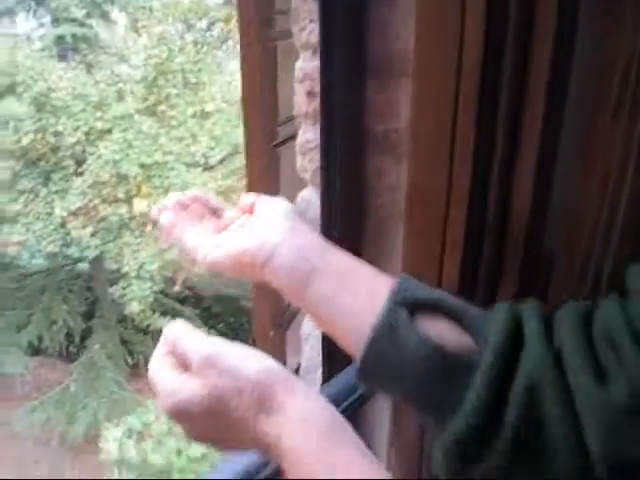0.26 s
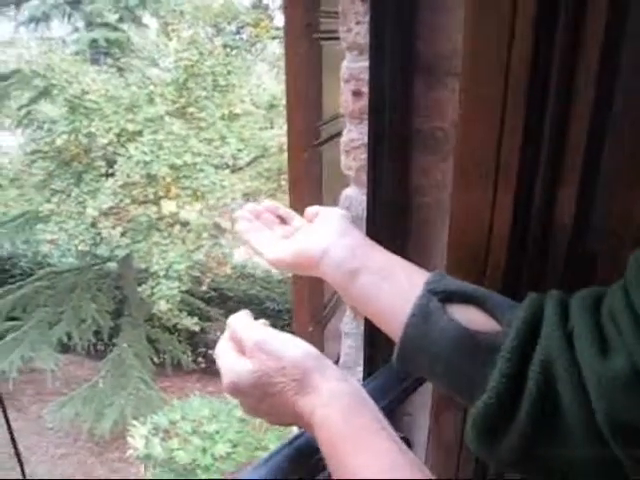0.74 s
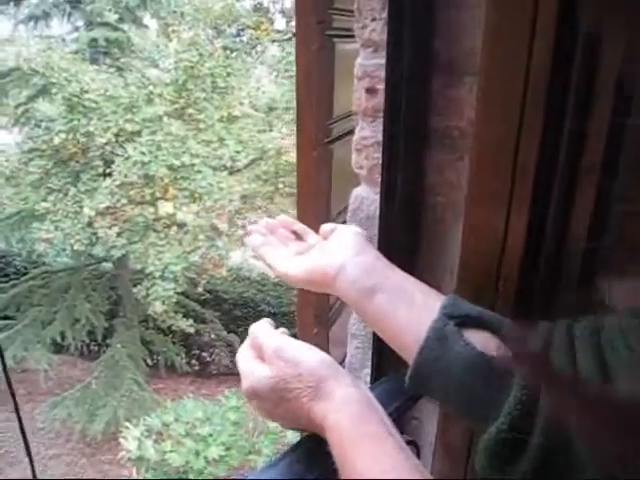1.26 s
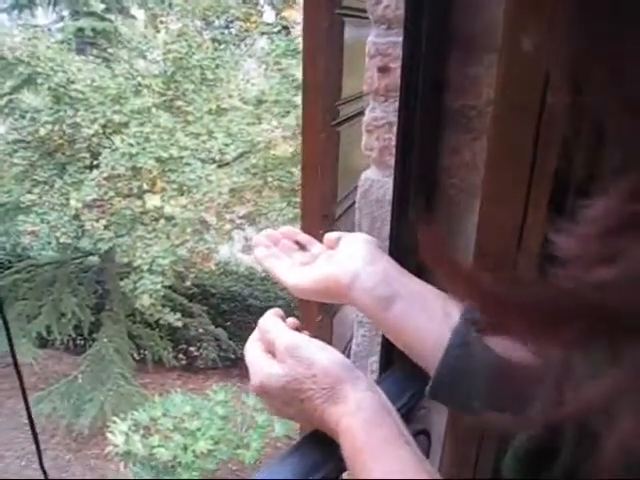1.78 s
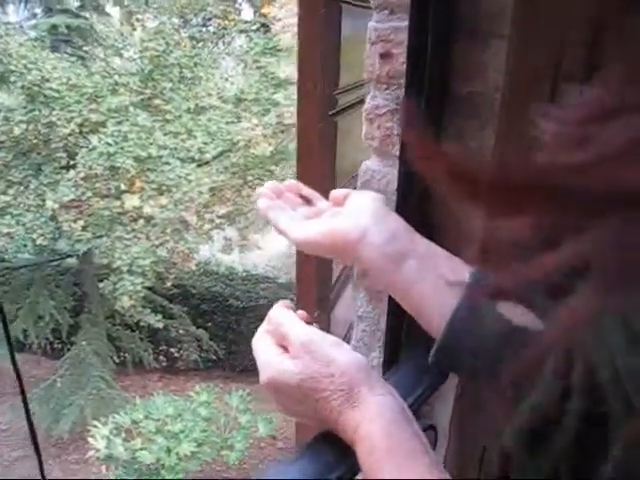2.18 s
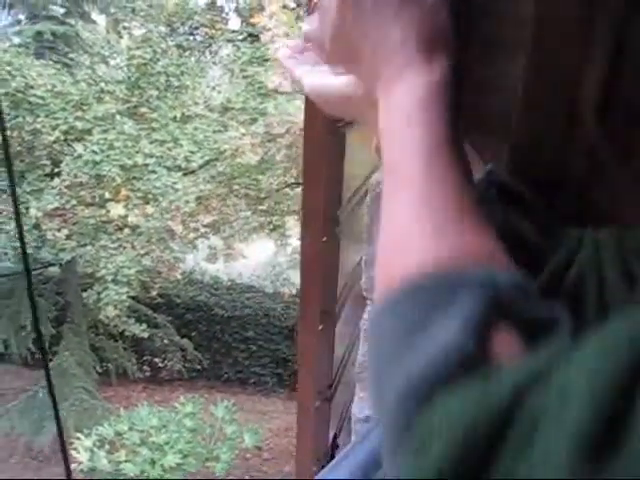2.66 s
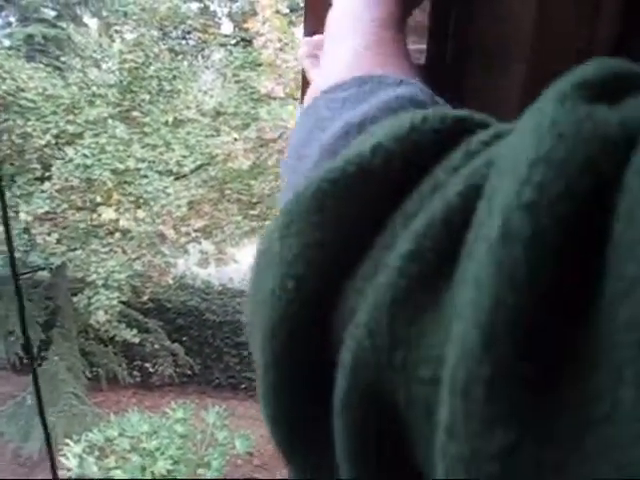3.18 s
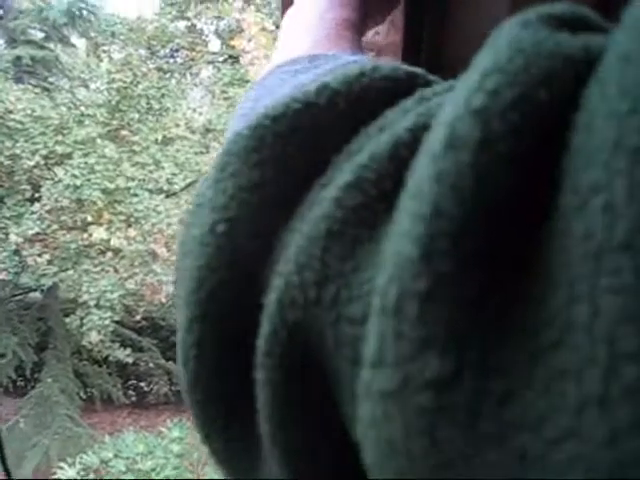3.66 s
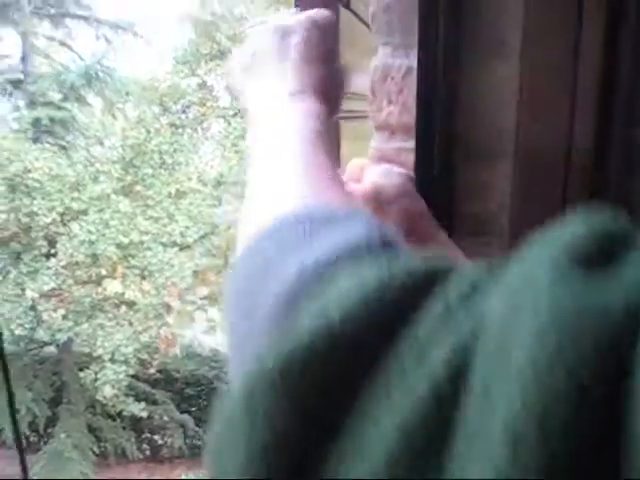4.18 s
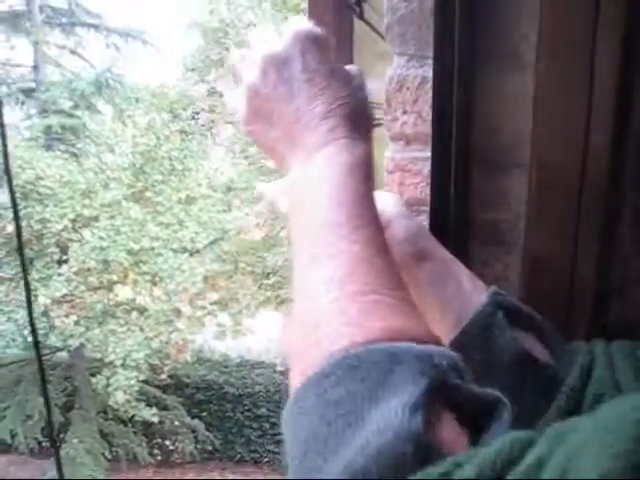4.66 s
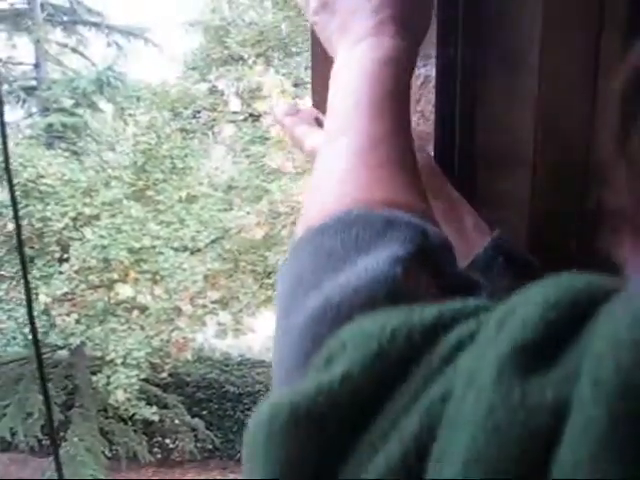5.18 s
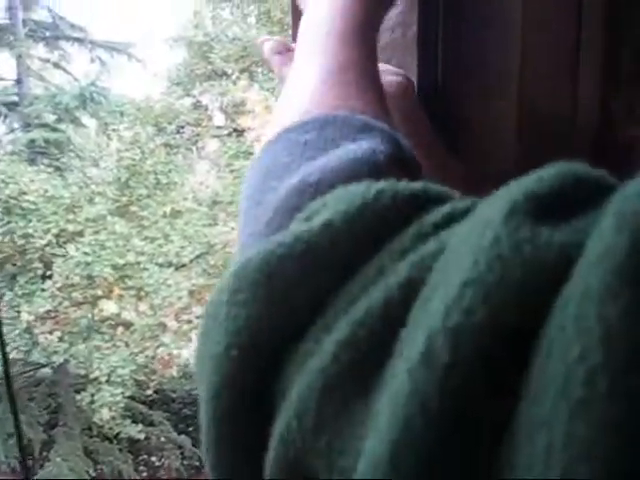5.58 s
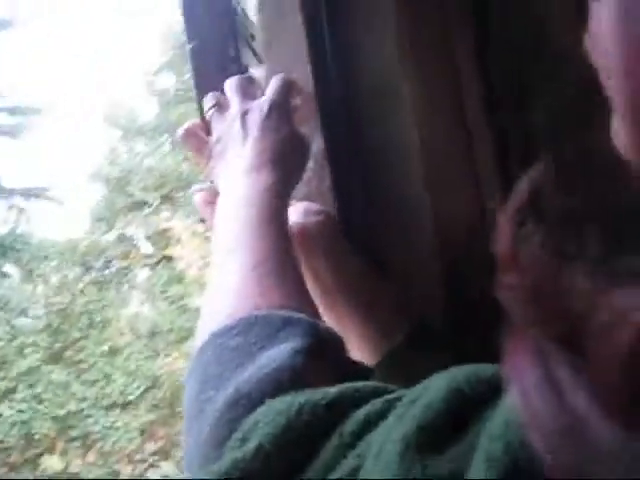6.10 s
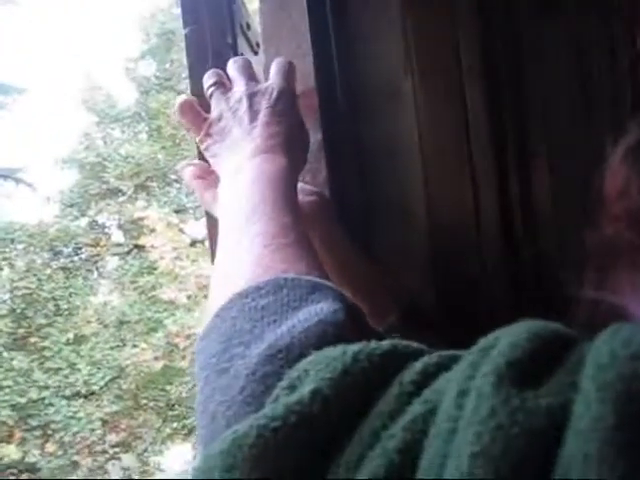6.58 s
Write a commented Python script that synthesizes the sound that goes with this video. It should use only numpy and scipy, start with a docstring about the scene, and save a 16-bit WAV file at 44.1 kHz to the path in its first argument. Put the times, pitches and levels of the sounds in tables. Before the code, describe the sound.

Through an open window, short brassy peacock honks break upward and drop, three seconds of calls, a pause, then four more, over distant traffic.

```python
"""A garden heard through an open window: a peacock some way off honks eight times, with faint far calls between.
Each honk is a harmonic tone that sweeps up and drops back, lighting up as its partials cross fixed resonances;
walls echo it. Distant traffic is shaped noise and wavering hum lines; a soft rustle is noise of uneven level.
A faint tick at the start, then one knock, are brief pulses with a slow swing back. A cheap camera samples slowly
and holds each sample, which mirrors the sound into the treble."""
import sys
import numpy as np
from scipy import signal
from scipy.fft import rfft, irfft, next_fast_len
from scipy.io import wavfile
from scipy.ndimage import map_coordinates

SR = 44100
rng = np.random.default_rng(int(sys.argv[2]) if len(sys.argv) > 2 else 0)


def pcm_store(signal):
    """Save signal as 16-bit PCM."""
    levels = np.round(np.clip(np.atleast_2d(signal), -1, 1) * 32767)
    wavfile.write(sys.argv[1], SR, levels.astype(np.int16).T)


def makeup_ratio(level_db):
    """Linear amplitude ratio for a level in decibels (20 dB per factor of ten)."""
    decades = np.asarray(level_db, float) / 20
    return 10 ** decades


N = 301644
HOLD = 4  # output samples for each one the converter takes

# Relative spectral density of the preamp hiss: f/Hz, level/dB
HISS_SPECTRUM = [(20, -31), (1000, -8.5), (2000, -6.5), (3500, -7.5), (5500, -7.5)]
# Relative spectral density of the traffic rumble: f/Hz, level/dB
RUMBLE_SPECTRUM = [(38, -47), (64, -7), (81, -9.5), (108, -2), (167, -1), (265, -10), (292, -17),
                   (330, -13.5), (430, -42), (730, -120)]
# Rumble level before its random swell: t/s, level/dB
RUMBLE_LEVEL = [(0.0, -38.5), (0.34, -41.5), (0.68, -38), (1.94, -39), (3.45, -39), (4.11, -38.5),
                (6.51, -40), (6.84, -40.5)]
# Hum lines, mean frequency and rms level before wavering: f/Hz, level/dB
HUM_LINES = [(47, -45), (120, -53.5), (410, -59.5)]
# Relative spectral density of the steady outdoor wash: f/Hz, level/dB
WASH_SPECTRUM = [(200, -44), (340, -18), (356, -13.5), (408, -5), (486, -9.5), (513, -6), (602, -4),
                 (798, -13.5), (1120, -10), (1480, -19), (2100, -28), (2730, -38), (4620, -120)]
# Relative spectral density of the rustle: f/Hz, level/dB
RUSTLE_SPECTRUM = [(900, -32), (1800, -0.5), (2800, -2.5), (4500, -8), (5500, -15.5)]
# Rustle level before its uneven grain: t/s, level/dB
RUSTLE_LEVEL = [(0, -53), (.2, -57), (.38, -50), (.55, -55), (.85, -52.5), (1.3, -57.5), (5.8, -57.5),
                (6.4, -52.5), (6.84, -57)]
# A faint tick at the start, then one knock against the camera body:
# t/s, pulse level/dB, pulse decay time/s, swing relative to pulse/dB
TICK_AND_KNOCK = [(.021, -22, .0002, -20), (.8649, -16.5, .0012, -4)]

# Throat and window resonances: centre f/Hz, width/Hz, level/dB
RESONANCES = [(520, 216, -3), (669, 147, 3.5), (991, 37, -3.5), (1107, 49, -2.5), (1275, 42, 1.5),
              (1445, 41, 3), (1618, 140, -4)]
# Near wall echoes: delay/s, level at 630 Hz/dB
NEAR_WALLS = [(.055, -28.5), (.1, -20), (.135, -31.5), (.195, -28.5)]

# Voice levels below hold ahead of the resonances; partial levels are relative to the fundamental.
# Shape of one far call: t from its start/s, f/Hz, relative effort/dB, second partial/dB, third partial/dB
FAR_CALL_SHAPE = [(0, 303, -61, 17, -10), (.015, 322.5, -17.5, 13.4, -10), (.035, 315, -11, 7.4, -11),
                  (.048, 322, -8, 11, -10), (.056, 520, -5, 11, -15), (.072, 534, -7.5, 15, -23),
                  (.09, 554, -15, 8.9, -19), (.11, 560, -15, 6.4, -13)]
# Faint far calls; the one at .94 is the second honk's echo off the far wall: start t/s, gain on the shape/dB
FAR_CALLS = [(.205, -31.5), (.94, -37.5), (1.93, -36.5), (3.957, -36.5), (5.705, -36.5)]
# Thin second voice riding over the first honk: t/s, f/Hz, effort/dB, second partial/dB, third partial/dB
SQUEAL = [(0.351, 1220, -52, -40, -40), (0.381, 1323, -31, -40, -40), (.415, 1580, -41, -40, -40),
          (.437, 1462, -29, -40, -40), (.46, 1400, -54, -40, -40)]

# Shapes of the parts of a honk, before each part's own shifts of pitch and level:
# fraction of part length, f/Hz, relative effort/dB, second partial/dB, third partial/dB
SCOOP = [(0, 245, -24, 20, -10), (.6, 278, -11, 16, -6)]  # upward start of every honk
LOW_NOTE = [(0, 300.6, -1.5, 15, -13), (1, 302.7, -1, 11.1, 0)]  # low note of every honk
MIDDLE = [(0, 481.7, 1.5, 2.27, -20.5), (.55, 486.3, -4, -0.29, -8), (1, 480, 0, -2, -17)]  # middle register of a full honk
CLIMB = [(0, 590, -6, -10, -23)]  # step up to the top note
TOP = [(0, 629.3, 0, -16, -35), (.3, 641, -0.5, -21, -33), (.75, 640, 2.5, -15.5, -33),
       (1, 627, -2.5, -15.5, -30)]  # top note
FALL = [(.25, 602, -6, -8, -26), (.55, 525, -8, -1, -9.5), (1, 490, -17, -10, 2)]  # drop from the top note
GLIDE = [(0, 505, -2.5, 22.5, -6), (.2, 541, -3.5, 26.4, 9), (.5, 569, -6.5, 19.5, -15),
         (.8, 597, 1.5, 11, -20)]  # upward glide of a thin honk
CREST = [(0, 628, -12, 3, -25), (.42, 636, -0.5, -5.5, -25), (.72, 637, -9.5, -2, -22),
         (1, 644.5, -21, 10.5, -20)]  # swell at its crest
DROP = [(.3, 541, 0, 14, -14), (.55, 520, -4, 27, 3), (1, 482, -10, 8.4, 5)]  # drop from the crest

# Opening of every honk: low note t/s, scoop length/s, low note length/s, level/dB, pitch shift/Hz
OPENINGS = [(0.291, .024, .028, -40, -2.5), (0.694, .012, .014, -37, 13.5), (1.376, .032, .012, -31.5, 1),
            (2.053, .03, 0.0095, -30.5, 4), (4.739, .03, 0.0062, -41, -3), (5.102, .015, .01, -32.5, 3),
            (5.952, .028, .021, -33.5, 0), (6.598, .027, .012, -31.5, 0)]
# Middles of the full honks: t/s, length/s, added pitch rise/Hz, level/dB, second partial shift/dB
MIDDLES = [(1.393, 0.021, 53.8, -24, 5.5), (2.068, 0.022, 55.6, -23, 3.5), (4.762, 0.03, 61.3, -22.5, 0.5),
           (5.978, 0.0241, 35.3, -22.5, 8), (6.614, 0.026, 36.4, -20.5, 3)]
# Tops of the full honks: t/s, length/s, level/dB, sag over the note/dB, period doubling/dB
TOPS = [(1.427, 0.039, -12, -7.5, -26), (2.106, .038, -11.5, -9, -29), (4.812, 0.03, -11.5, -10, -16),
        (6.017, .046, -11.5, -11.5, -27), (6.656, 0.041, -12.5, -9, -15)]
# Glides of the thin honks: t/s, length/s, level/dB
GLIDES = [(0.325, 0.034, -35.5), (0.721, 0.049, -39.5), (5.136, .058, -41.5)]
# Crests of the thin honks: length/s, added pitch rise/Hz, level/dB, second partial shift/dB, drop level/dB
CRESTS = [(0.067, 13.7, -16.5, -14, -41), (0.062, 51.8, -24.5, 1.5, -44.5), (0.041, 34, -24.5, 2, -40.5)]


def filtered(x, response):
    """Linear filtering: the spectrum of x times a complex response of frequency."""
    m = next_fast_len(len(x) + 8192)
    hz = np.fft.rfftfreq(m, 1 / SR)
    return irfft(rfft(x, m) * response(hz), m)[:len(x)]


def noise(spectrum):
    """Coloured noise of rms 1: white noise shaped by spectrum points on a log-frequency axis."""
    f, db = np.transpose(spectrum)
    white = rng.standard_normal(N)
    x = filtered(white, lambda hz: makeup_ratio(np.interp(np.log(hz + 1), np.log(f + 1), db)))
    return x / x.std()


def wobble(rate, size=N):
    """Slow random modulation: a smooth curve through random knots, rate of them a second."""
    knots = rng.standard_normal(int(size * rate / SR) + 4)
    return map_coordinates(knots, [np.arange(size) * rate / SR])


def level(rows):
    """Amplitude envelope: gain per sample, interpolated in decibels between points."""
    return makeup_ratio(np.interp(np.arange(N) / SR, *np.transpose(rows)))


def add(track, s, x):
    """Superposition: sums x into track from time s."""
    span = track[round(s * SR):][:len(x)]
    span += x[:len(span)]


def preamp_hiss():
    """Stationary electrical noise with a fixed coloured spectrum."""
    return makeup_ratio(-46.5) * noise(HISS_SPECTRUM)


def traffic():
    """Noise and tones combined: a slowly swelling far rumble, wavering hum lines and a steadier wash."""
    swell_db = .7 * wobble(3) + .7 * wobble(9)
    rumble = level(RUMBLE_LEVEL) * makeup_ratio(swell_db) * noise(RUMBLE_SPECTRUM)
    wash = makeup_ratio(-44 + 0.079 * wobble(1.87)) * noise(WASH_SPECTRUM)
    hum = np.zeros(N)
    for hz, rms_db in HUM_LINES:
        gain = np.sqrt(2) * makeup_ratio(rms_db + 2.2 * wobble(9))
        phase = 2 * np.pi * np.cumsum(hz + 1.75 * wobble(7)) / SR
        hum += gain * np.sin(phase)
    return rumble + wash + hum


def rustle():
    """Amplitude-modulated noise: a soft rustle that comes and goes, uneven in grain."""
    grain = makeup_ratio(1.8 * wobble(25))
    return level(RUSTLE_LEVEL) * grain * noise(RUSTLE_SPECTRUM)


def tick_and_knock():
    """Impulse and damped oscillation: each is a quick, soft-edged pulse, then a slow swing back."""
    out = np.zeros(N)
    t = np.arange(SR // 20) / SR
    for s, db, decay_s, swing_db in TICK_AND_KNOCK:
        pulse = 2.4 * (1 - np.exp(-(t / .0005) ** 2)) * np.exp(-t / decay_s)
        swing = makeup_ratio(swing_db) * np.sin(2 * np.pi * 42 * t) * np.exp(-t / .01)
        add(out, s - .0005, makeup_ratio(db) * (pulse - swing))
    return out


def garden(x, tail_db, t60, far_db):
    """Reflection and scattering: direct sound, wall echoes and a diffuse tail; leaves scatter high partials more."""
    t = np.arange(SR) / SR
    tail = rng.standard_normal(SR) * makeup_ratio(-60 * t / t60) * (1 - np.exp(-t / 0.013))
    path = makeup_ratio(tail_db) * tail / np.linalg.norm(tail)
    for delay, db in NEAR_WALLS + [(.265, far_db)]:  # the last is one far wall
        path[round(delay * SR)] += makeup_ratio(db)
    path = filtered(path, lambda hz: (hz / 630) ** 0.6)
    path[0] += 1  # direct sound
    return signal.fftconvolve(x, path)


def resonances(hz):
    """Forced resonance: a causal sum of band-pass peaks, cut off steeply above the last."""
    peaks = 0
    for k, (centre, width, db) in enumerate(RESONANCES):
        damping = 1j * hz * width
        peak = damping / (centre * centre - hz * hz + damping)
        peaks = peaks + (-1) ** k * makeup_ratio(db) * peak  # alternating sign
    return peaks / (1 + (hz / 1720) ** 20)


def voice(rows, double_db):
    """Harmonic source: three gliding partials, breath gated each cycle, period doubling adding lines halfway."""
    s, *cols = np.transpose(rows)
    t = np.arange(s[0], s[-1], 1 / SR)
    size = len(t)
    hz, effort_db, second_db, third_db = (np.interp(t, s, c) for c in cols)
    phase = 2 * np.pi * np.cumsum(hz * (1 + .007 * wobble(150, size))) / SR

    def flutter():
        """Random amplitude modulation, drawn afresh at each call."""
        return makeup_ratio(1.8 * wobble(140, size))

    second = makeup_ratio(second_db) * flutter() * np.sin(2 * phase)
    third = makeup_ratio(third_db) * flutter() * np.sin(3 * phase)
    halves = makeup_ratio(double_db) * flutter() * (np.sin(3 * phase / 2) + np.sin(5 * phase / 2) / 3)
    breath = makeup_ratio(-2 + second_db / 2) * rng.standard_normal(size) * (1 + np.sin(phase))
    # a fast glide or a break of register thins the overtones
    steady = 1 / (1 + (np.gradient(hz) * SR / 6500) ** 2)
    effort = makeup_ratio(effort_db + 1.1 * wobble(90, size))
    return effort * (np.sin(phase) + steady * (second + third) + halves + breath)


def part(shape, start, length, db, rise_hz=0, bright_db=0, sag_db=0):
    """Scaling of a contour: one part of a honk placed in time, stretched, bent upward and set in strength."""
    return [(start + length * u, hz + rise_hz * u, effort_db + db + sag_db * u, second_db + bright_db, third_db)
            for u, hz, effort_db, second_db, third_db in shape]


def opening(before):
    """Rising onset: the scoop and low note of the honk that breaks upward at this time."""
    s, scoop, length, db, shift_hz = [row for row in OPENINGS if row[0] < before][-1]
    rows = part(SCOOP, s - scoop, scoop, db) + part(LOW_NOTE, s, length, db)
    return [(t, hz + shift_hz, *rest) for t, hz, *rest in rows]


def full_honks():
    """Register breaks: low note, middle register, climb to a sagging top note, fall; with period doubling."""
    climb_s, fall_s = 0.0084, .035
    for middle_row, top_row in zip(MIDDLES, TOPS):
        s, length, rise_hz, middle_db, bright_db = middle_row
        up, top_s, top_db, sag_db, double_db = top_row
        rows = opening(s)
        rows += part(MIDDLE, s, length, middle_db, rise_hz, bright_db)
        rows += part(CLIMB, up - climb_s, climb_s, top_db)
        rows += part(TOP, up, top_s, top_db, sag_db=sag_db)
        rows += part(FALL, up + top_s, fall_s, top_db + sag_db)
        yield rows, double_db


def thin_honks():
    """Gliding second partial: low note, upward glide, brief swell at the crest, drop; with period doubling."""
    drop_s, double_db = 0.0495, -30
    for (s, glide_s, glide_db), crest_row in zip(GLIDES, CRESTS):
        crest_s, rise_hz, crest_db, bright_db, drop_db = crest_row
        rows = opening(s)
        rows += part(GLIDE, s, glide_s, glide_db)
        rows += part(CREST, s + glide_s, crest_s, crest_db, rise_hz, bright_db)
        rows += part(DROP, s + glide_s + crest_s, drop_s, drop_db)
        yield rows, double_db


def birds():
    """Source and filter: near honks and faint far calls, each echoed by the garden, through the same
    resonances."""
    out = np.zeros(N)
    far_wall_db = -25.5
    for rows, double_db in [*full_honks(), *thin_honks()]:
        honk = voice(rows, double_db)
        add(out, rows[0][0], garden(honk, tail_db=-11.5, t60=0.86, far_db=far_wall_db))
    squeal = voice(SQUEAL, double_db=-60)
    add(out, SQUEAL[0][0], garden(squeal, tail_db=-31, t60=1.8, far_db=far_wall_db))
    for s, db in FAR_CALLS:
        call = voice(FAR_CALL_SHAPE, double_db=-39)
        add(out, s, makeup_ratio(db) * garden(call, tail_db=-12, t60=0.63, far_db=-30))
    return filtered(out, resonances)


def scene():
    """Superposition of traffic, rustle, tick, knock and birds at one microphone."""
    return (traffic() + rustle() + tick_and_knock() + birds())[None]


def sample_and_hold(x):
    """Zero-order hold: every fourth sample is kept and repeated, which mirrors the band into the treble."""
    x = filtered(x, lambda hz: hz < SR / HOLD / 2)
    held = np.repeat(x[2::HOLD], HOLD)
    return np.pad(held, (2, HOLD), "edge")[:N]


def top_cut(x):
    """Nothing passes above the cut-off."""
    return signal.sosfilt(signal.butter(12, 15540, fs=SR, output="sos"), x)


def record(dry):
    """Additive noise and conversion: preamp hiss and a constant offset, then a slow sample-and-hold converter."""
    x = dry[0] + preamp_hiss() - .0025
    mix = sample_and_hold(x)[None]
    return top_cut(mix)


dry = scene()
out = record(dry)
pcm_store(out)
```